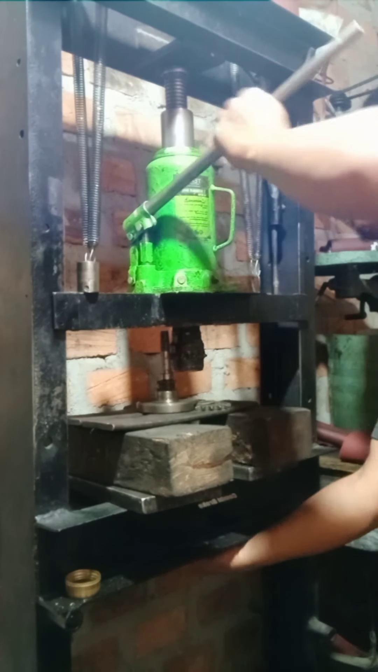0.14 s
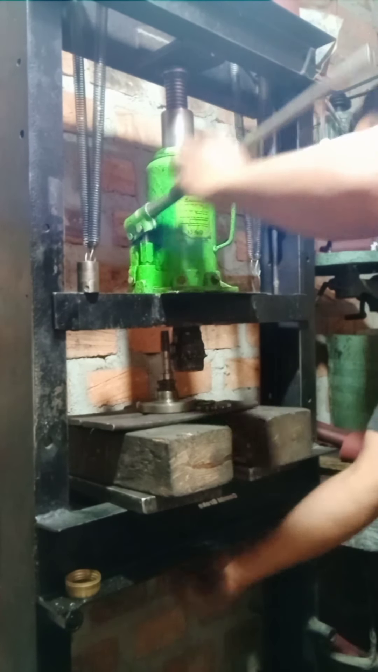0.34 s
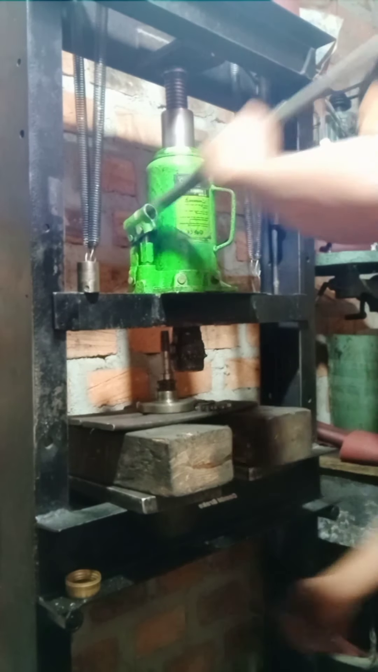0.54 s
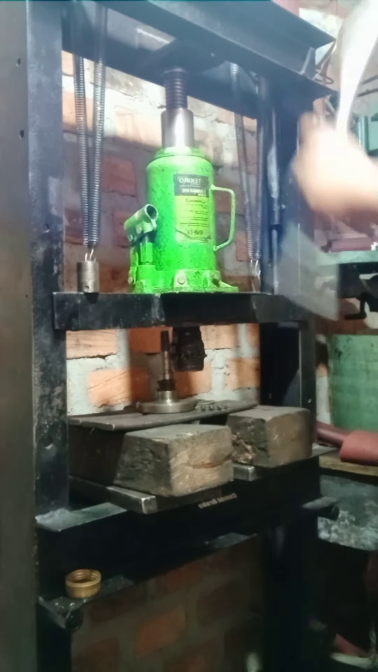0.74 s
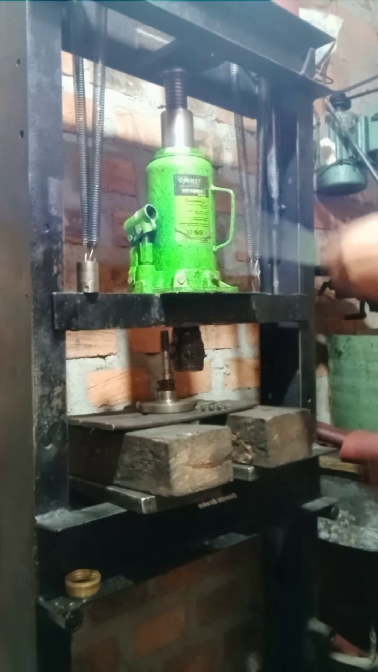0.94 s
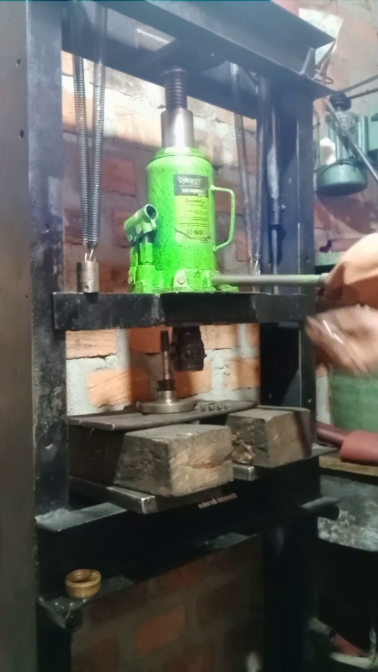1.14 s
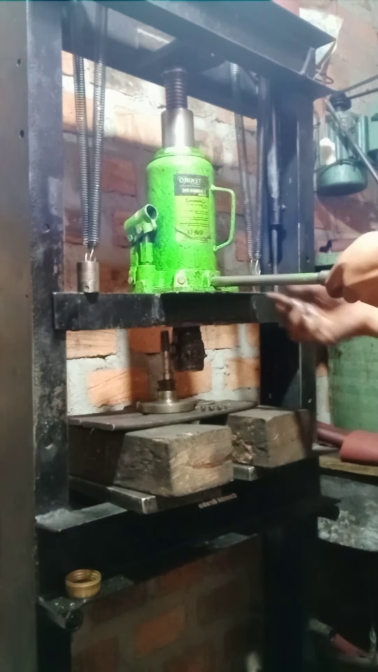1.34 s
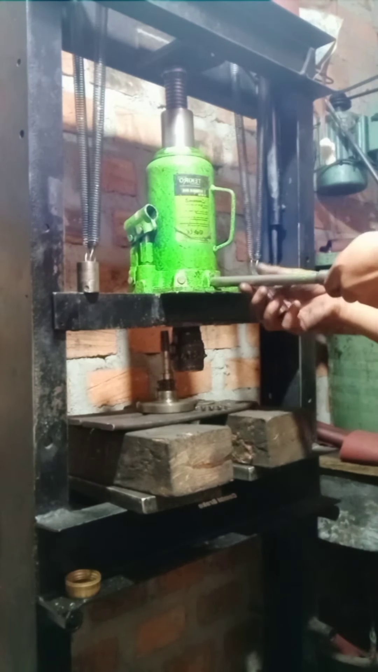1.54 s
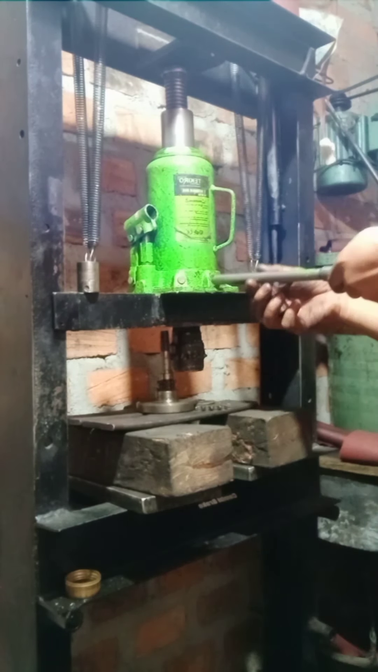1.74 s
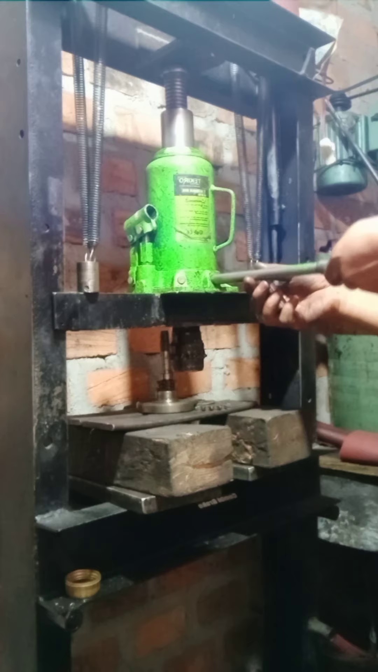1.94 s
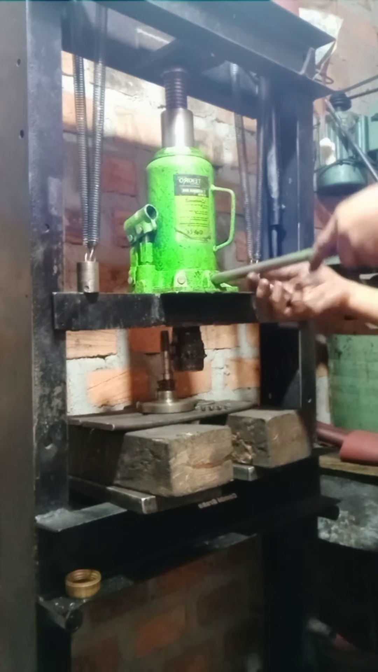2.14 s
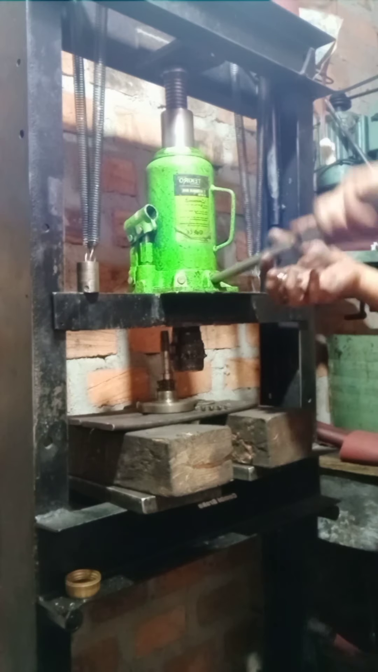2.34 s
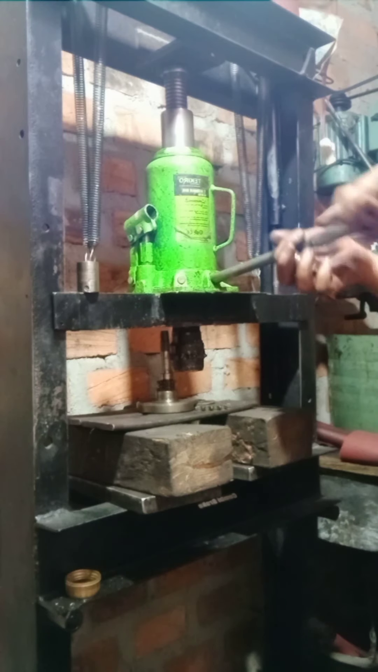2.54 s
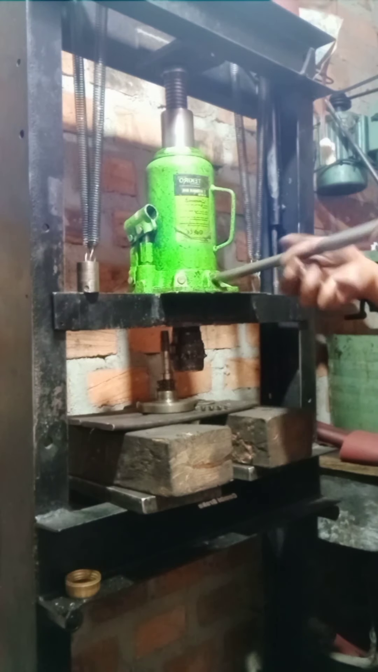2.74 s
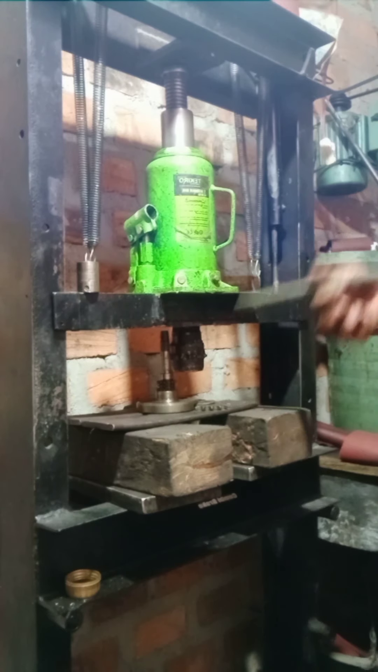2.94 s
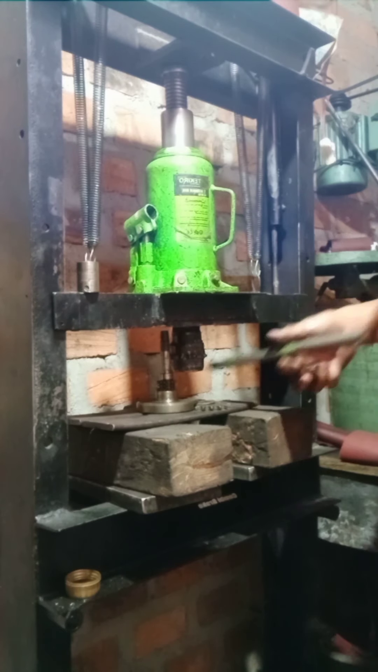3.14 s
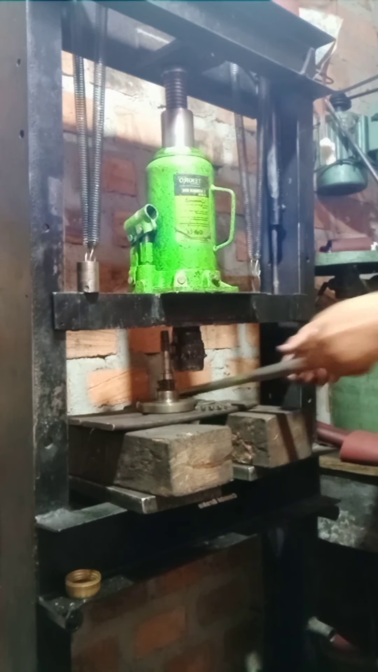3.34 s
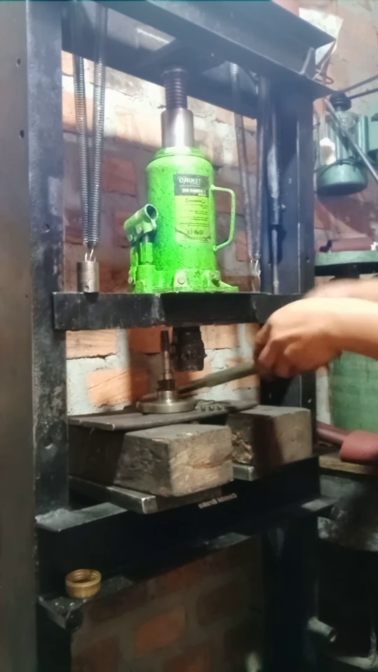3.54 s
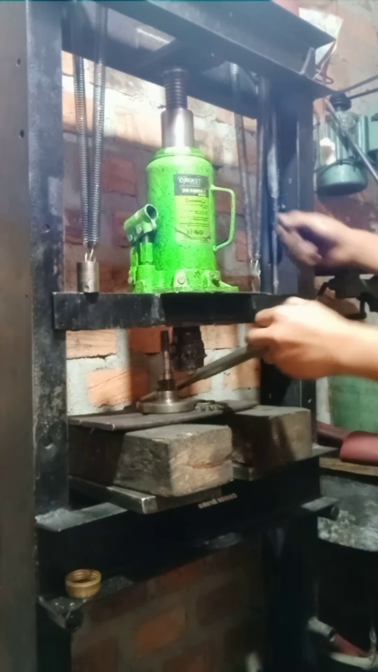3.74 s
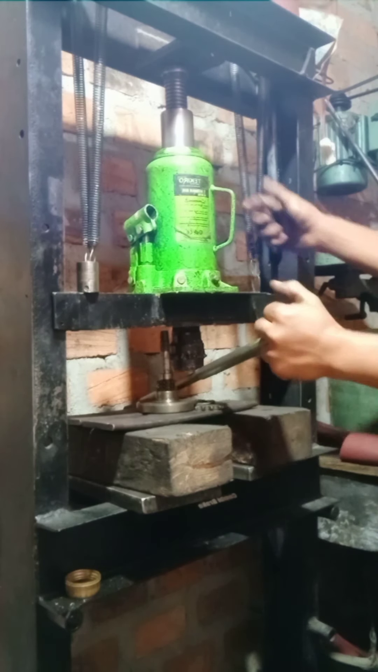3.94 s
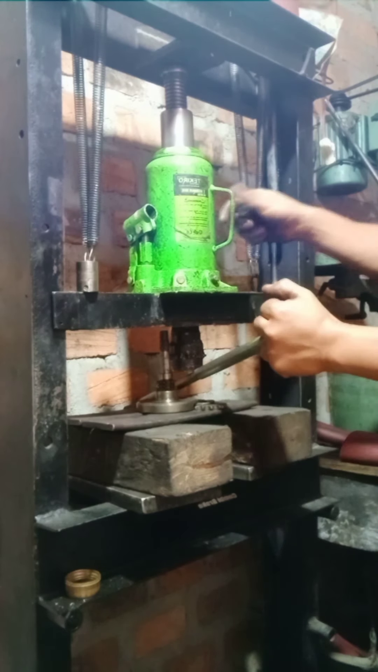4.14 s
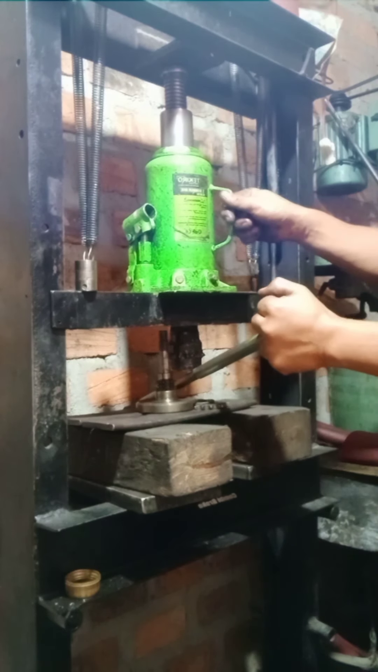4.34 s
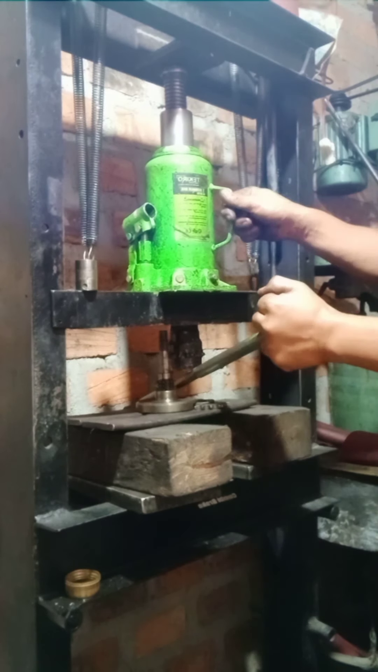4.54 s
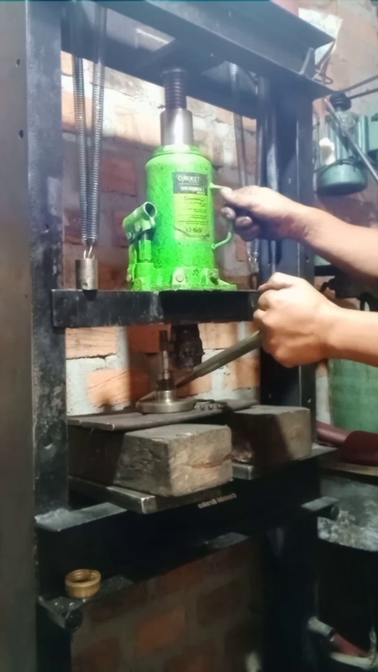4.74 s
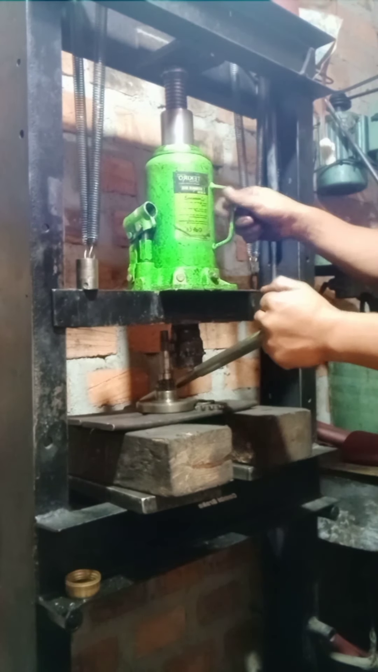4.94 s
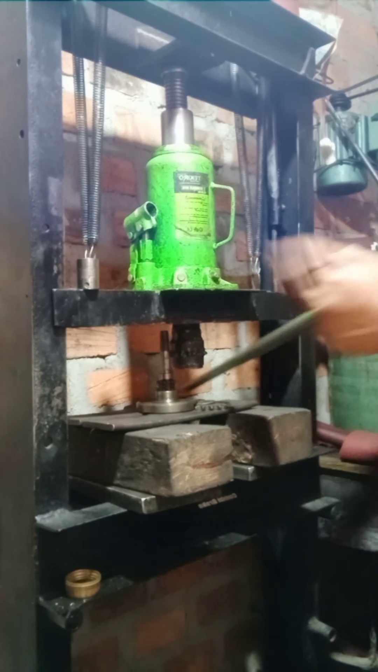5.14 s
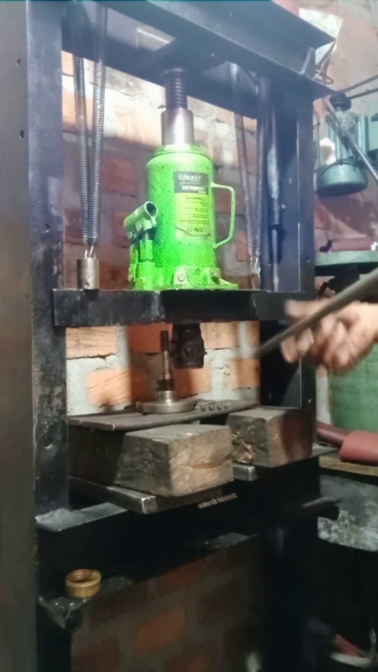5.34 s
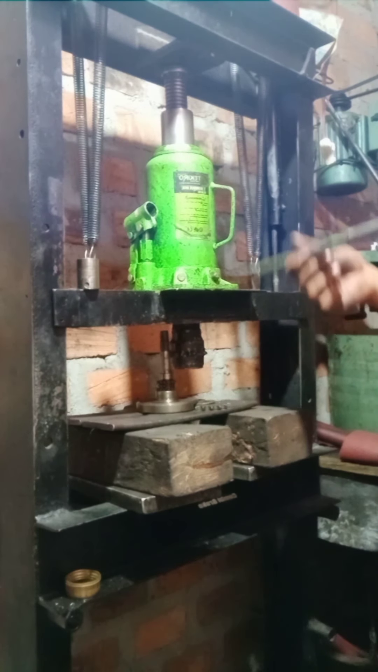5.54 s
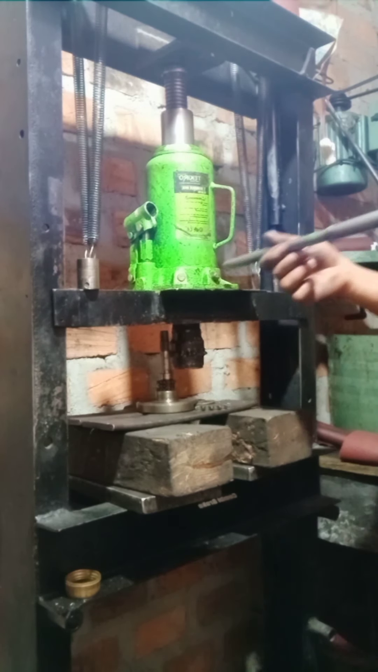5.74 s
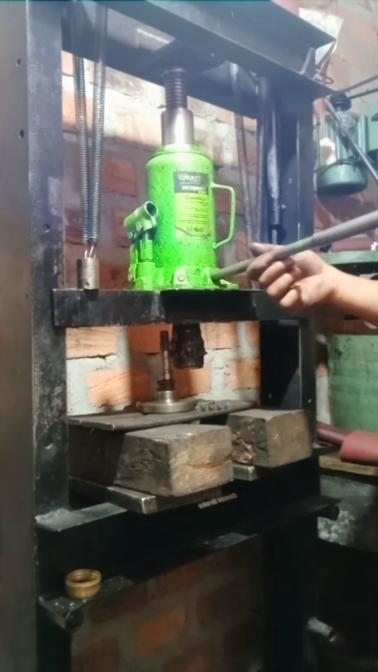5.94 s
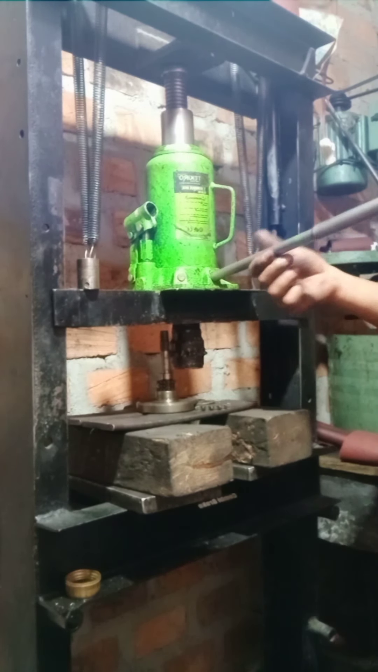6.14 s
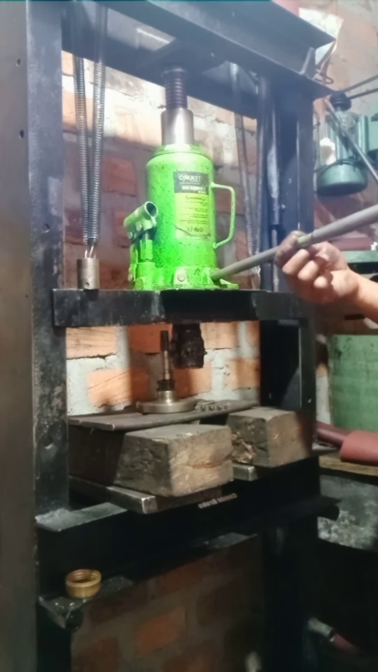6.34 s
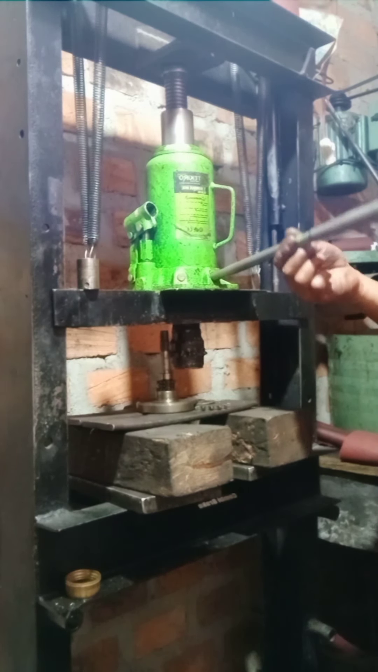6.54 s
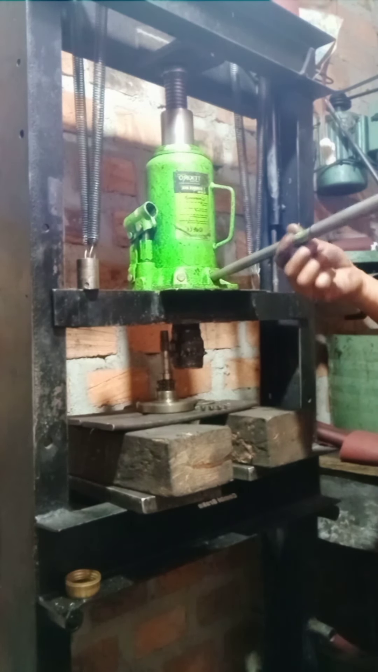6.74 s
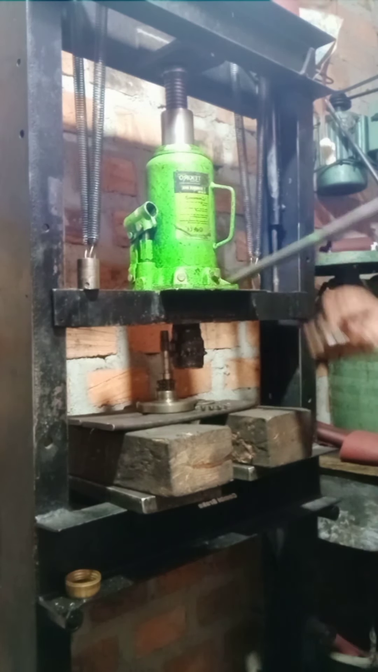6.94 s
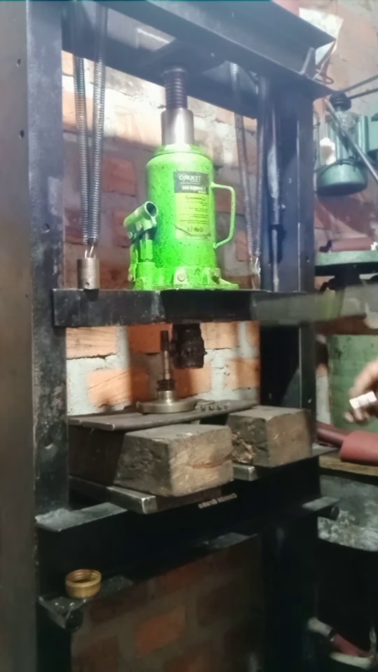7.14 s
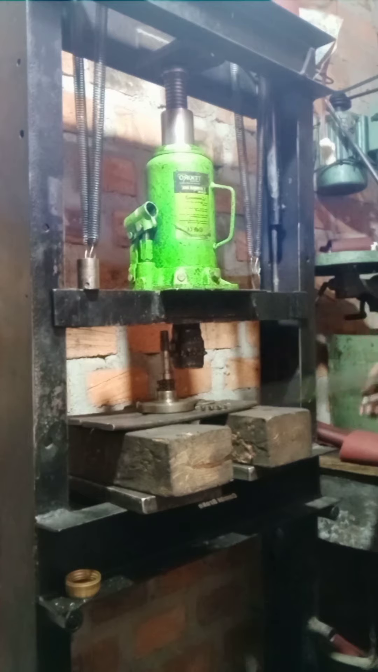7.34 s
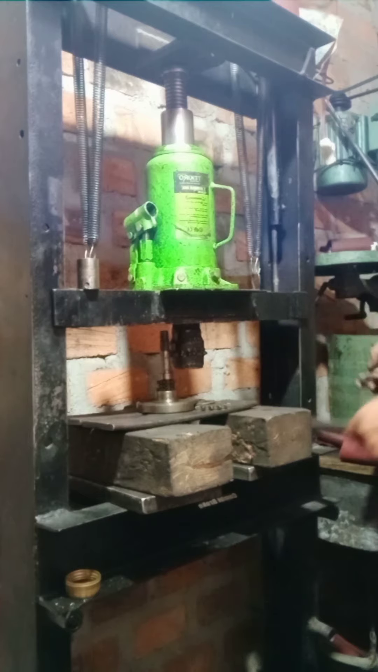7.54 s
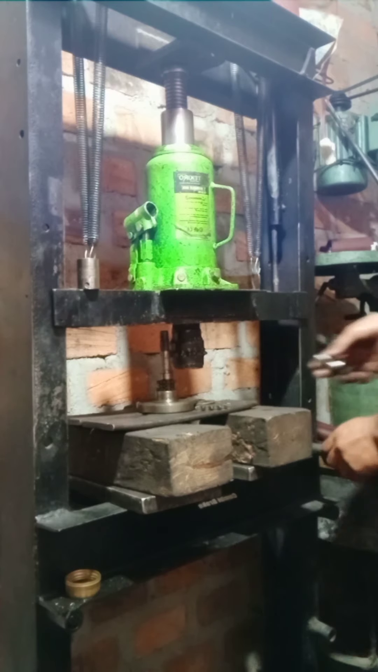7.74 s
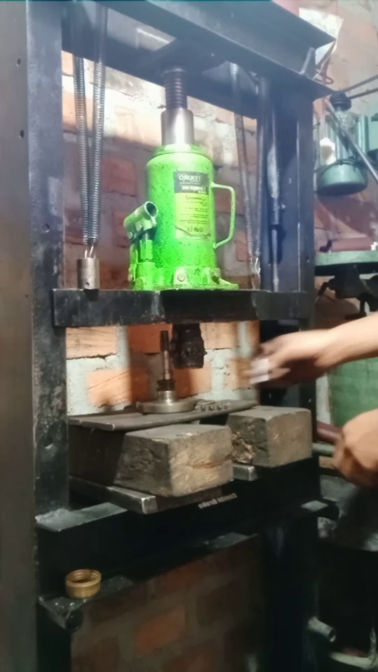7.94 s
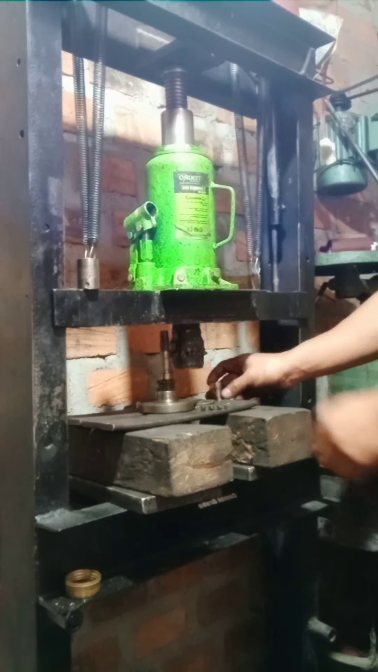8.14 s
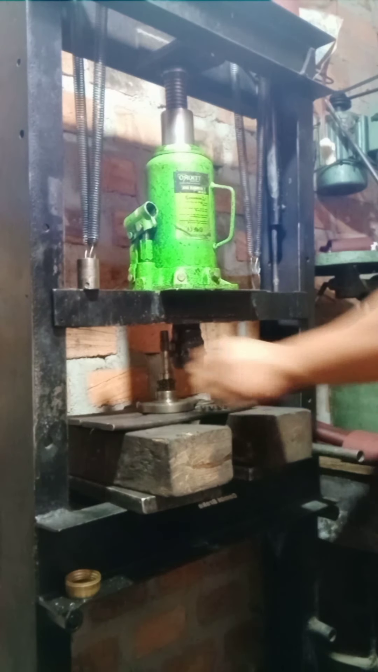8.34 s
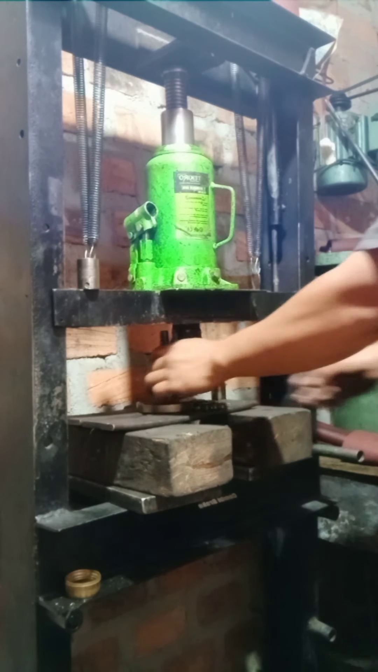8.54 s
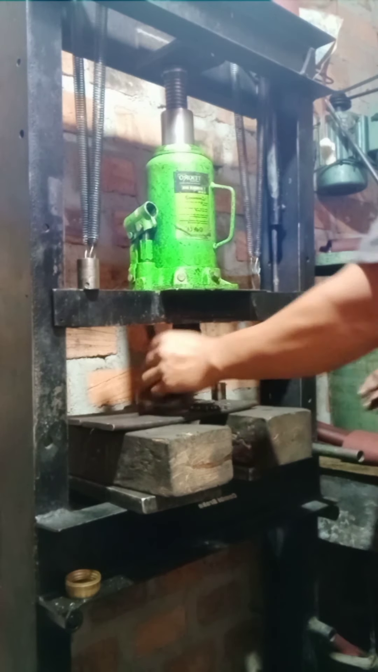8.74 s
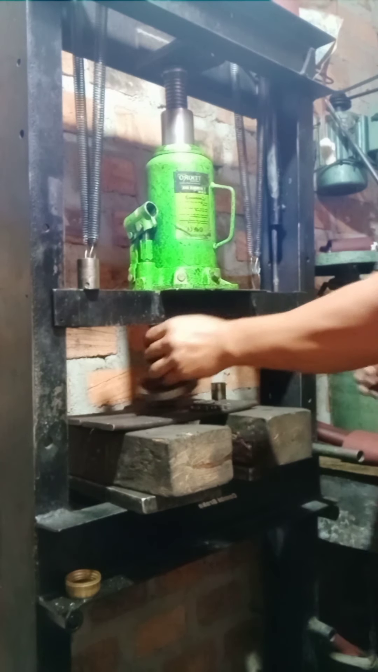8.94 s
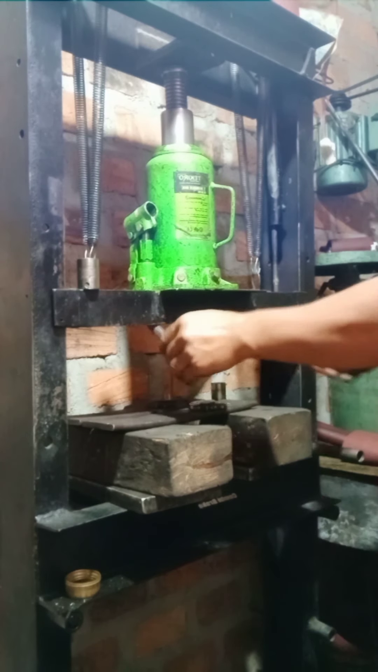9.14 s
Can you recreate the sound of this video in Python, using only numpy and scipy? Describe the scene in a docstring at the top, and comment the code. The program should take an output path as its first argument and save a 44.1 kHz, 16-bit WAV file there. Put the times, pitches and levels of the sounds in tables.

```python
"""A steel pump handle is pulled from the jack of a workshop press, tried on the release valve and laid down.
Loose plates clank on the frame, springs sing on, the handle clinks, ticks and scrapes, a socket lands on the bed.
Contacts are noise bursts through steel resonances; springs and socket are decaying sines; a brick room answers.
Soft bumps and shuffles are noise puffs. Outside, a bird of wavering tones calls twice and sine hoots come from far.
One microphone takes it all in, over quiet air, a swelling low rumble and a late hum.
"""
import sys
import numpy as np
from scipy import signal
from scipy.fft import rfft, irfft, next_fast_len
from scipy.io import wavfile
from scipy.ndimage import map_coordinates

SR = 44100
rng = np.random.default_rng(int(sys.argv[2]) if len(sys.argv) > 2 else 0)


def store_wav(level_fs):
    """Save 16-bit WAV to argv[1]."""
    pcm = np.round(np.clip(np.atleast_2d(level_fs), -1, 1) * 32767)
    wavfile.write(sys.argv[1], SR, pcm.T.astype(np.int16))


N = 405259

# Blows on the press frame and its loose plates:
# start_s, level_db, hardness_db_per_octave, clang_db, rattle_s, struck_spot_hz
FRAME_BLOWS = [(.003, -43.5, -0.75, 6, 0.0022, 2575), (.233, -18.5, 4, 7.5, .095, 3430),
               (.462, -22.5, 3.5, -1, 0, 7243), (.559, -22.5, 2.4, 2.5, 0, 7360),
               (.722, -39.5, -6, 4.5, 0.0027, 2180), (1.073, -58.5, -1.5, 6, 0.039, 2750),
               (1.607, -40.5, 4.5, 12.5, 0.00079, 2850), (1.637, -41.5, 2.5, 9.5, 0, 2020),
               (2.831, -58.5, 0.5, 2.5, 0, 3028), (3.775, -58.5, -0.2, 9, 0.00044, 2670),
               (4.074, -55.5, -4.6, 4, 0, 3460), (4.114, -34.5, 7, 4, 0, 4206),
               (4.596, -29.5, 0.5, 6.4, 0, 2554), (4.641, -33.5, 7.5, 7.8, 0.0039, 5910),
               (4.721, -25.5, 5, 1.5, .015, 5680), (4.749, -21.5, 3, 5.5, .085, 1271),
               (4.962, -44, -0.5, 15.5, 0.0041, 2340), (6.404, -46.5, -4.5, 14.5, 0.00096, 1820),
               (6.456, -41, 3, 8.5, 0.11, 2325), (6.599, -28, -2.5, 4.5, 0.0028, 2400),
               (6.646, -28.5, 4.5, 3.5, 0.00094, 4200), (6.669, -25, 2, 3.5, 0.019, 5897),
               (6.941, -55, -0.8, 14, 0.00017, 2310), (7.087, -37, -3.5, 1.5, 0.0015, 2314),
               (7.224, -20, 1.2, 18, 0, 2296), (7.324, -17.5, 4, 12.5, 0.0013, 1266),
               (7.384, -18, 1.5, 20, .008, 2234), (7.417, -21, 3.5, 10.5, 0.053, 3520),
               (7.87, -39, -9.5, 3.5, 0, 2030), (8.558, -21, 3, 5.5, 0.0044, 6210),
               (8.639, -22, -1, 15, 0.0024, 1278), (8.821, -39, -1.5, 14.5, 0.00084, 1240)]
# Knocks of the handle; a loose grip lets it ring. The last row, at 8.80 s, is the socket's small second ping as
# it bounces: # start_s, level_db, hardness_db_per_octave, clang_db, ring_db, struck_spot_hz
HANDLE_KNOCKS = [(.912, -48.5, -1, 11.5, -3.5, 2850), (.939, -46, -2, 13, -13, 2850),
                 (.984, -56.5, 2.5, 7, 2, 2850), (1.289, -55.5, 9, 24, -25.5, 2826),
                 (1.428, -56.5, 3, 14, -5, 2850), (1.58, -49, 8, 12, -5.5, 2850),
                 (2.453, -54.5, 7, 1, 2.5, 2850), (3.016, -33, 3.5, 7.5, -6, 1590),
                 (3.133, -35.5, 5.5, 12, 20.5, 1590), (3.195, -37.5, 5.5, 0.5, 10, 1590),
                 (3.451, -22, 7.5, 8, -4, 1288), (3.467, -26.5, 4.5, 6, -8, 1180),
                 (5.661, -39.5, 11, 8, -7.5, 3480), (5.717, -35, 1.5, 3, -15.5, 2850),
                 (7.475, -31.5, 3, 5.5, 6, 4748), (8.80, -49.5, 0, 0, -1, 4700)]
# The handle slides over steel: start_s, end_s, level_db, ring_db
HANDLE_SLIDES = [(1.375, 1.46, -65.5, -6.5), (1.446, 1.542, -57.5, -17), (1.597, 1.656, -44.5, -39),
                 (2.779, 2.814, -54.5, -33), (3.077, 3.263, -41, -1), (4.086, 4.138, -48, -23),
                 (5.77, 5.935, -61.5, -20)]
# Resonances of the press frame, width before squaring, level before the ring setting:
# centre_hz, width_hz, level_db
FRAME_MODES = [(161, 27, 13), (334, 28, 11), (481, 32, 6), (717, 16, 10), (1076.8, 31, 8.5),
               (1267, 56, 15.5), (1334, 29, 5.5), (1613, 23, 9), (1922, 45, 6), (2229, 100, 7),
               (2380, 140, 4.5), (2725, 50, 5), (2990, 30, 11), (3520, 90, 6.5), (3830, 50, 4),
               (4275, 80, 10), (4930, 61, -2), (6020, 140, 11), (5790, 80, 8), (7550, 150, 6.5),
               (7080, 40, 10), (7480, 43, 8.5)]
# Bending modes of the handle, in the same terms: centre_hz, width_hz, level_db
HANDLE_MODES = [(1180, 210, -1.5), (1590, 40, 17), (2850, 87, 17), (3160, 300, 4.5), (4748, 160, 26.5),
                (5020, 55, 11), (6544, 100, 20), (7280, 52, 15), (9060, 230, 12), (11180, 110, 15),
                (14370, 80, 24.5)]
# Colour of a steel contact: frequency_hz, relative_level_db
CONTACT_COLOUR = [(40, -39.5), (120, -20), (300, -8), (600, -5), (850, -4.5), (1200, 4), (1700, -1.5),
                  (3000, 1.5), (5000, -1), (7600, -0.5), (9000, -9), (10500, -20), (13300, -27),
                  (15300, -21.5), (16500, -34)]
# Edges between thud, clang, body and crack: edge_hz
BAND_EDGES_HZ = [950, 1800, 4000]
# Thud, clang, body and crack of a contact: centre_hz, share_of_clang (a plain ratio)
CONTACT_BANDS = [(600, 0), (1300, 1.065), (2700, 0.76), (6000, 0.0078)]
# Return springs of the press: pitch_hz, relative_level_db, t60_s
SPRING_MODES = [(1046, -11, .7), (1134, -10, .7), (1362, 0, 1.7), (1631, -13, .9), (1798, -11, 1.3),
                (1922, -11, 1.1), (2318, -12, 1.1), (2369, -9, .9), (2869, -10, .7), (3166, -12, .7),
                (4090, -11, .7)]
# Blows that reach the springs: start_s, level_db, favoured_mode_hz, its_lead_db
SPRING_HITS = [(0, -61.5, 1362, 7), (0.232, -51, 1362, 4), (4.964, -68.5, 2369, 21),
               (7.389, -52.5, 4090, 13.5), (8.638, -43, 1362, 0)]
# Ring of the small steel socket: pitch_hz, level_db, t60_s
SOCKET_MODES = [(2690, -17, 0.24), (6280, -17, 0.3), (12328, -52, 0.54)]
# Reverberation of the room: frequency_hz, t60_s
ROOM_DECAY = [(150, 0.043), (400, 0.36), (1040, 0.38), (2760, 0.33), (7280, 0.24), (15000, 0.13)]
# Bird calls outside: start_s, level_db
BIRD_CALLS = [(2.828, -45), (8.262, -45.5)]
# Syllables of one call: offset_s, length_s, top_pitch_hz, relative_level_db, rasp (0-1)
CALL_SYLLABLES = [(0, .145, 3014, -2, 0.4), (0.131, .1, 2598, -2, .55), (0.217, .125, 3130, 4, .2)]
# Far hoots: start_s, length_s, pitch_hz, level_db
FAR_HOOTS = [(2.019, 0.097, 812, -74), (3.881, 0.11, 816, -69.5), (4.387, 0.11, 828, -67),
             (5.36, 0.06, 812, -71.5), (6.115, 0.12, 827.3, -63)]
# Colour of the quiet air: frequency_hz, relative_level_db
AIR_COLOUR = [(25, -24.5), (60, -2.5), (160, 4.5), (300, -4.5), (600, -10.5), (1250, -11.5), (2000, -18),
              (4500, -21), (6500, -17), (7500, -15.5), (9500, -28), (12500, -41), (15000, -26.5),
              (16000, -33.5)]
# Soft bumps and shuffles, length before the room answers: start_s, length_s, centre_hz, level_db
SOFT_PUFFS = [(3.498, .12, 66, -64), (4.215, 0.084, 348, -67.5), (5.364, 0.12, 96, -58.5),
              (5.759, 0.1, 332, -53.5), (7.865, 0.0387, 168, -48.5), (8.188, 0.17, 627, -67),
              (8.419, 0.085, 400, -62), (8.931, 0.094, 450, -58)]
# The low hum sets in: time_s, level_db
HUM_LEVEL = [(8.4, -86.5), (8.7, -70.5), (9.19, -66.5)]
# Peaks of the low rumble: peak_s, level_db
RUMBLE_PEAKS = [(3.5, -63.5), (5.55, -65)]
# Unevenness of the dense steel modes: frequency_hz, spread_db
MODE_UNEVENNESS = [(500, 1), (2500, 2), (8000, 3.5)]

# A loose plate rebounds at a near-even pace; strength is against the blow, loss is per rebound
REBOUND_S, REBOUND_SCATTER_S, REBOUND_DB, REBOUND_LOSS_DB = .034, .003, -6, 1.4
FRAME_RING_DB = -6  # the frame's resonances against its bed of dense modes
MODE_SPACING_HZ = 70
# The handle's tip ticks faintly while it is fitted to the valve; hardness in dB per octave
TICK_SPAN_S, TICK_DB, TICK_SCATTER_DB, TICK_HARDNESS = (1.85, 3.8), -65.5, 2, 8
# Share by which the pitch sags at both ends; share of the length spent swelling and fading
SYLLABLE_ARCH, SYLLABLE_FADE = 0.034, 0.54
# The rumble swells quickly and ebbs slowly
RUMBLE_REST_DB, SWELL_DB_PER_S, EBB_DB_PER_S = -76.5, 25, 6
TOP_HZ = 16100  # band limit of the phone
T = np.arange(int(.7 * SR)) / SR  # clock of one contact or room tail (s)


def amp(db):
    """Decibels to gain."""
    return 10 ** (np.asarray(db) / 20)


def unit(x):
    """Scale to rms 1."""
    return x / np.sqrt(np.mean(x ** 2) + 1e-20)


def along(points, hz):
    """Read (Hz, value) points on a log frequency axis."""
    f, v = np.transpose(points)
    return np.interp(np.log(hz + 1), np.log(f + 1), v)


def add(track, s, sound):
    """Mix a sound into the track at a time in seconds."""
    part = track[max(0, round(s * SR)):][:len(sound)]
    part += sound[:len(part)]


def wobble(rate, size):
    """A smooth random curve of rms 1 with rate knots a second."""
    knots = rng.standard_normal(int(size * rate / SR) + 4)
    return unit(map_coordinates(knots, [np.arange(size) * rate / SR]))


def filtered(x, response):
    """Shape the spectrum of x by a response of frequency."""
    m = next_fast_len(len(x) + 4096)
    spectrum = rfft(x, m) * response(np.fft.rfftfreq(m, 1 / SR))
    return irfft(spectrum, m)[..., :len(x)]


def tail():
    """The room's answer: noise that dies at its own pace in each frequency band."""
    hz, t, z = signal.stft(rng.standard_normal(len(T)), SR, nperseg=256)
    decay = amp(-60 * t / along(ROOM_DECAY, hz)[:, None])
    return signal.istft(z * decay, SR, nperseg=256)[1][:len(T)]


def in_room(x, wet_db):
    """A sound plus its reverberation."""
    answer = unit(tail()) / np.sqrt(len(T))
    return np.pad(x, (0, len(T) - 1)) + amp(wet_db) * signal.fftconvolve(x, answer)


def steel(modes, ring_db):
    """Response of a steel part: an uneven bed of dense modes plus a few steep resonances."""
    hz = np.arange(0, SR // 2, 3)
    peaks = 0
    for centre, width, db in modes:
        resonance = 1j * hz * width / (centre * centre - hz * hz + 1j * hz * width)
        peaks = peaks + amp(db) * resonance ** 2
    crowd_db = along(MODE_UNEVENNESS, hz) * wobble(SR * hz[1] / MODE_SPACING_HZ, len(hz))
    response = amp(along(CONTACT_COLOUR, hz) + crowd_db) * (1 + amp(ring_db) * peaks)
    return lambda f: np.interp(f, hz, response)


def contact(direct_db, chatter_t60, rise, uneven_db):
    """Steel meets steel: uneven decaying chatter with a room tail; t60 and rise in seconds."""
    level_db = direct_db - 60 * T / chatter_t60 + uneven_db * wobble(400, len(T))
    chatter = amp(level_db) * rng.standard_normal(len(T))
    return (chatter + tail()) * (1 - np.exp(-T / rise))


def struck(force, part, hardness, clang_db):
    """A part's answer, near rms 1 at its start: hardness tilts it to the treble, clang lifts its middle."""
    sound = filtered(force, part)
    band_of = lambda f: np.digitize(f, BAND_EDGES_HZ) == np.arange(len(CONTACT_BANDS))[:, None]
    strength = np.std(filtered(sound, band_of)[:, :SR // 25], axis=1)  # over the first 40 ms
    centre_hz, clang_share = np.transpose(CONTACT_BANDS)
    weight = amp(hardness * np.log2(centre_hz) + clang_db * clang_share)
    gain_db = 20 * np.log10(weight / np.linalg.norm(weight) / strength)
    # Flat gain inside each band, sloping across its edges
    slope_hz = np.outer(BAND_EDGES_HZ, [.85, 1.15]).ravel()
    slopes = np.c_[slope_hz, np.repeat(gain_db, 2)[1:-1]]
    return filtered(sound, lambda f: amp(along(slopes, f)))


def ring(modes, waver):
    """One second of freely decaying (Hz, dB, t60) modes whose strength wavers by some dB."""
    t = np.arange(SR) / SR
    total = np.zeros(SR)
    for hz, db, t60 in modes:
        level_db = db - 60 * t / t60 + waver * wobble(40, SR)
        total += amp(level_db) * np.sin(2 * np.pi * hz * t)
    return (1 - np.exp(-t / 0.0025)) * total


def background(air_db, hum_hz):
    """Filtered noise makes quiet air and a low rumble that comes and goes; a sine makes the late hum."""
    t = np.arange(N) / SR
    air = unit(filtered(rng.standard_normal(N), lambda f: amp(along(AIR_COLOUR, f))))
    # Rumble colour: frequency_hz, relative_level_db
    low_colour = [(25, -33.5), (45, -19.5), (60, -0.5), (100, 3.0), (220, -16.0), (600, -70.0)]
    low = unit(filtered(rng.standard_normal(N), lambda f: amp(along(low_colour, f))))
    swells_db = [db - np.maximum(SWELL_DB_PER_S * (s - t), EBB_DB_PER_S * (t - s))
                 for s, db in RUMBLE_PEAKS]
    rumble_db = np.maximum(RUMBLE_REST_DB, np.max(swells_db, axis=0))
    hum = amp(np.interp(t, *np.transpose(HUM_LEVEL))) * unit(np.sin(2 * np.pi * hum_hz * t))
    wavering_air_db = air_db + 0.59 * wobble(6.7, N)
    return amp(wavering_air_db) * air + amp(rumble_db) * low + hum


def springs():
    """Blows on the frame shake the return springs; each blow favours one decaying mode."""
    out = np.zeros(N)
    for s, db, favoured_hz, lead_db in SPRING_HITS:
        favoured = np.argmin([abs(mode[0] - favoured_hz) for mode in SPRING_MODES])
        modes = [(hz, level + lead_db * (k == favoured), t60)
                 for k, (hz, level, t60) in enumerate(SPRING_MODES)]
        add(out, s, amp(db) * ring(modes, waver=1.2))
    return out


def clanks(note_db, note_width_hz):
    """A blow rings the frame and the note of its spot; a loose plate rebounds while it rattles."""
    out = np.zeros(N)
    touch = lambda: contact(direct_db=1.5, chatter_t60=.1, rise=.0012, uneven_db=2)
    for s, db, hardness, clang_db, rattle_s, note_hz in FRAME_BLOWS:
        force = touch()
        for k in range(int(np.ceil(rattle_s / REBOUND_S))):
            # A last, incomplete gap gives a weaker rebound
            strength = amp(REBOUND_DB - REBOUND_LOSS_DB * k) * min(1, rattle_s / REBOUND_S - k)
            rebound_s = (k + 1) * REBOUND_S + REBOUND_SCATTER_S * rng.standard_normal()
            add(force, rebound_s, strength * touch())
        part = steel([*FRAME_MODES, (note_hz, note_width_hz, note_db)], FRAME_RING_DB)
        add(out, s, amp(db) * struck(force, part, hardness, clang_db))
    return out


def clinks(note_db, note_width_hz):
    """Each knock rings the handle's bending modes and the note of its spot."""
    out = np.zeros(N)
    for s, db, hardness, clang_db, ring_db, note_hz in HANDLE_KNOCKS:
        force = contact(direct_db=4.5, chatter_t60=.094, rise=.00069, uneven_db=6)
        part = steel([*HANDLE_MODES, (note_hz, note_width_hz, note_db)], ring_db)
        add(out, s, amp(db) * struck(force, part, hardness, clang_db))
    return out


def scrapes(grain_db):
    """Sliding steel catches in tiny uneven slips that sound the handle."""
    out = np.zeros(N)
    for start, end, db, ring_db in HANDLE_SLIDES:
        size = max(256, int((end - start) * SR))
        grain = amp(grain_db * wobble(300, size))
        slips = rng.standard_normal(size) * grain * signal.windows.tukey(size)
        sound = filtered(in_room(slips, wet_db=-2), steel(HANDLE_MODES, ring_db))
        add(out, start, amp(db) * sound / np.std(sound[:size]))
    return out


def ticks(count, ring_db):
    """Light, damped touches of the handle's tip, at uneven moments."""
    out = np.zeros(N)
    slots = (np.arange(count) + rng.random(count)) / count
    for s in np.interp(slots, [0, 1], TICK_SPAN_S):
        force = contact(direct_db=10.5, chatter_t60=.06, rise=0.00077, uneven_db=-1.5)
        level = amp(TICK_DB + TICK_SCATTER_DB * rng.standard_normal())
        add(out, s, level * struck(force, steel(HANDLE_MODES, ring_db), TICK_HARDNESS, 0))
    return out


def hoots():
    """Faint hoots from far away: sines of steady pitch with reverberation."""
    out = np.zeros(N)
    for s, length, hz, db in FAR_HOOTS:
        t = T[T < length]
        hoot = signal.windows.tukey(len(t)) * np.sin(2 * np.pi * hz * t)
        add(out, s, amp(db) * in_room(hoot, wet_db=0.5))
    return out


def bird(rasp_hz, low_ratio, low_db):
    """Arched syllables from both sides of the syrinx: a whistle above a lower rasp, blurred by the walls."""
    out = np.zeros(N)
    tone = lambda pitch: np.sin(2 * np.pi * np.cumsum(pitch) / SR)
    for start, call_db in BIRD_CALLS:
        for s, length, top_hz, db, rasp in CALL_SYLLABLES:
            size = int(length * SR)
            hz = top_hz * (1 - SYLLABLE_ARCH * np.linspace(-1, 1, size) ** 2)
            whistle = tone(hz + rasp_hz * rasp * wobble(250, size))
            burr_level = amp(low_db + 3.6 * wobble(250, size)) * rasp
            burr = burr_level * tone(low_ratio * hz + 110 * wobble(400, size))
            syllable = signal.windows.tukey(size, SYLLABLE_FADE) * (whistle + burr)
            add(out, start + s, amp(call_db + db) * in_room(syllable, wet_db=6.0))
    return out


def shuffles():
    """Dull reverberant noise puffs, each round its centre: bumps, shuffles, the low thud under one blow."""
    out = np.zeros(N)
    for s, length, hz, db in SOFT_PUFFS:
        size = int(length * SR)
        rub = in_room(rng.standard_normal(size) * signal.windows.hann(size), wet_db=8)
        puff = filtered(rub, lambda f: amp(-22 * np.log2((f + 1) / hz) ** 2))
        add(out, s, amp(db) * puff / np.std(puff[:size]))
    return out


def socket():
    """The socket rings with a few clear decaying modes as it lands on the bed."""
    out = np.zeros(N)
    add(out, 8.559, ring(SOCKET_MODES, waver=1.72))
    return out


def scene():
    """Press, handle, soft puffs and background summed at the one microphone."""
    outside = background(air_db=-69.5, hum_hz=59.3) + hoots() + bird(rasp_hz=143, low_ratio=.87, low_db=-4)
    press = springs() + clanks(note_db=13.5, note_width_hz=120) + socket()
    handle = clinks(note_db=19, note_width_hz=150) + scrapes(grain_db=4) + ticks(count=4, ring_db=-18)
    return (press + handle + shuffles() + outside)[None]


def record(dry):
    """The phone's microphone channel keeps nothing above its band limit."""
    return filtered(dry[0], lambda f: f < TOP_HZ)[None]


dry = scene()
out = record(dry)
store_wav(out)
```